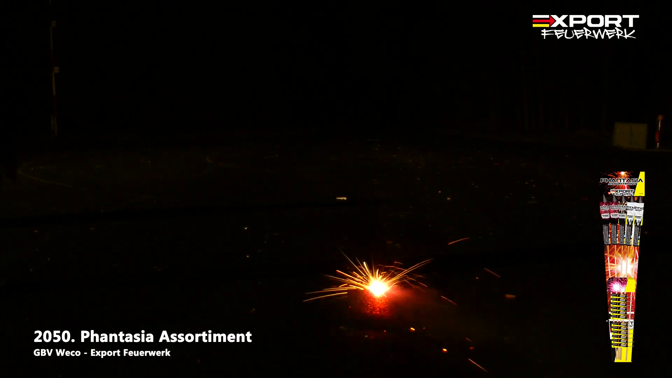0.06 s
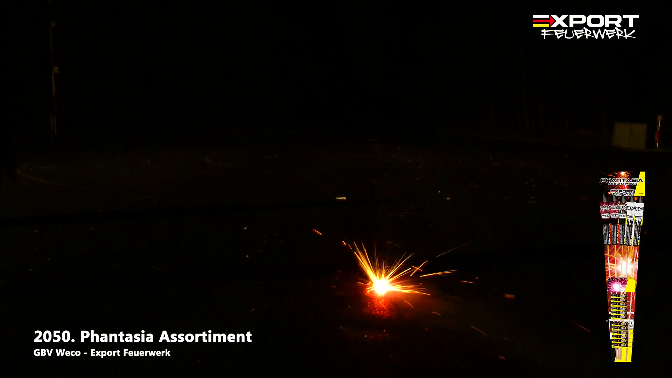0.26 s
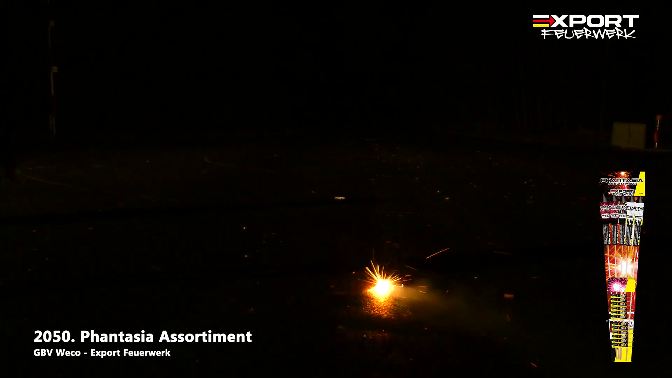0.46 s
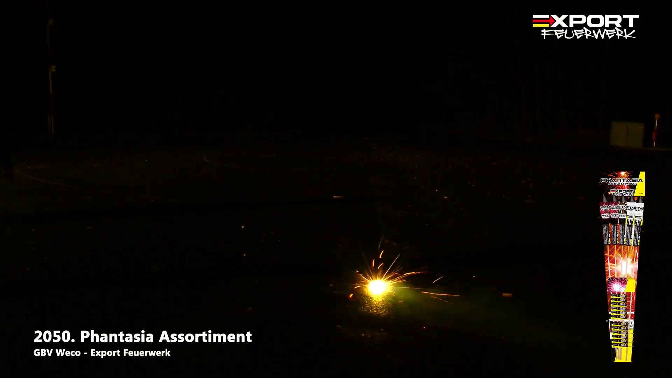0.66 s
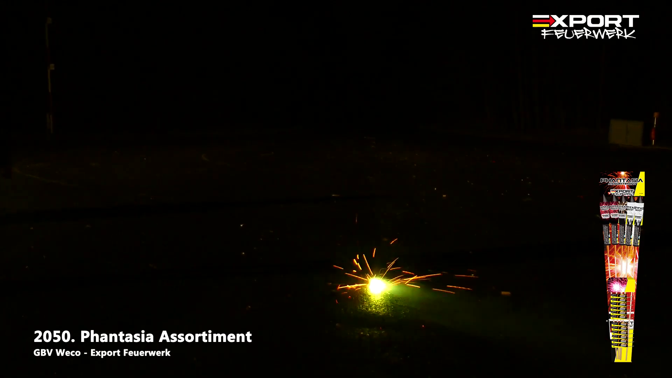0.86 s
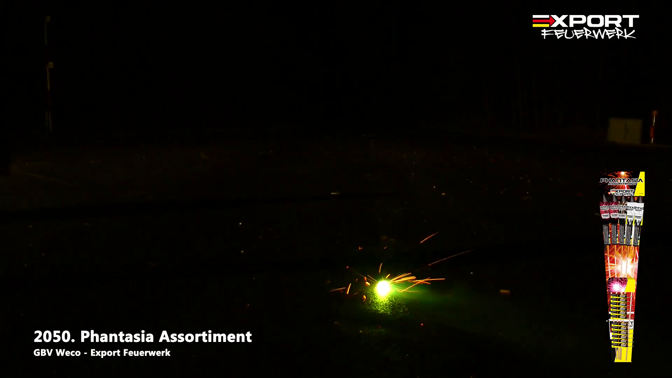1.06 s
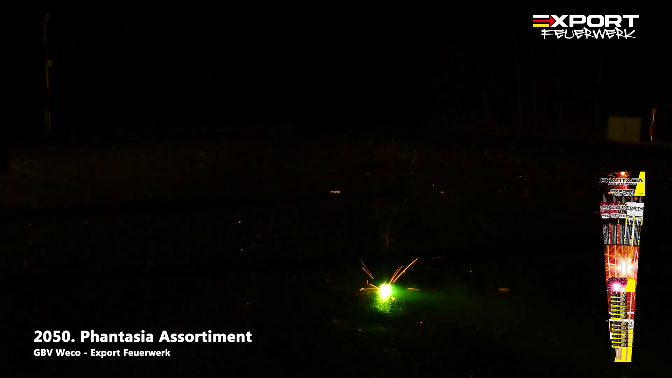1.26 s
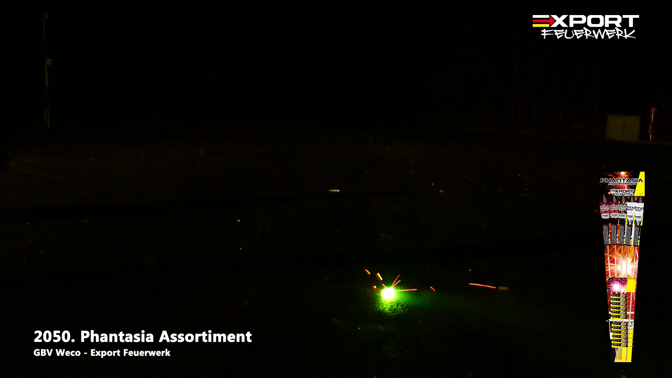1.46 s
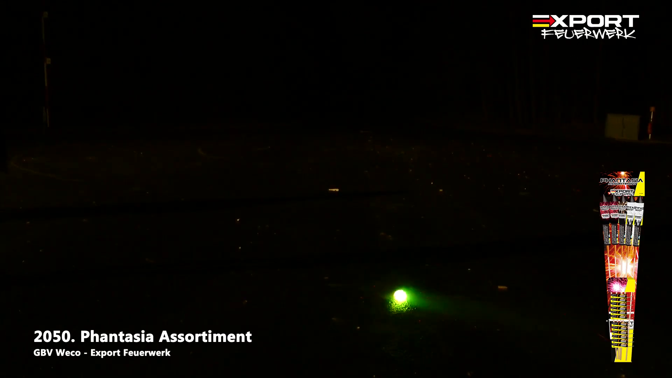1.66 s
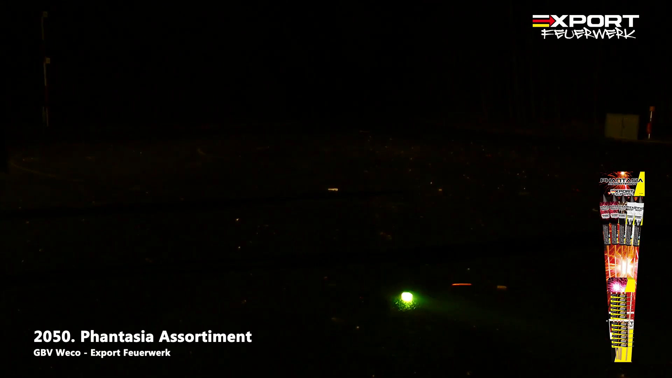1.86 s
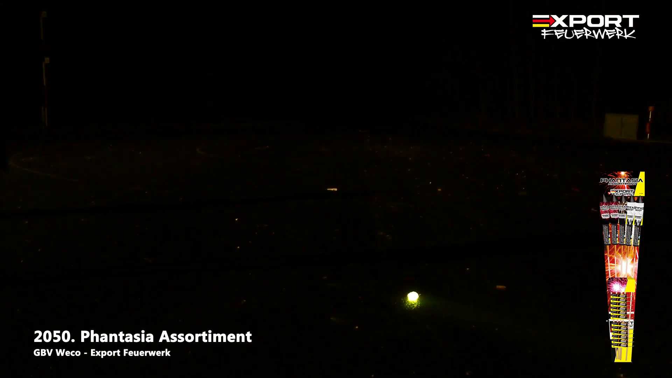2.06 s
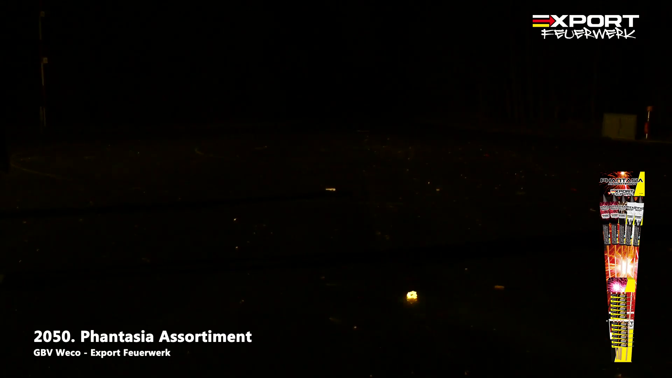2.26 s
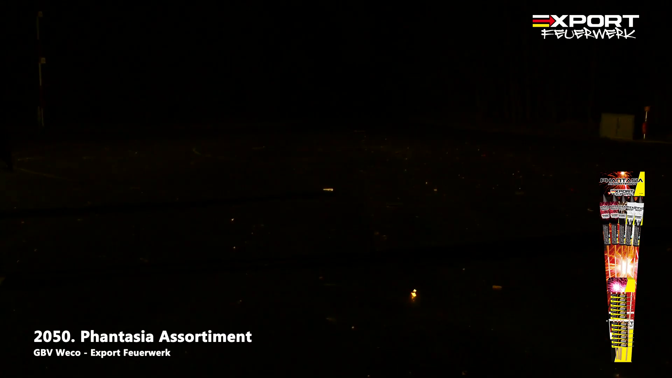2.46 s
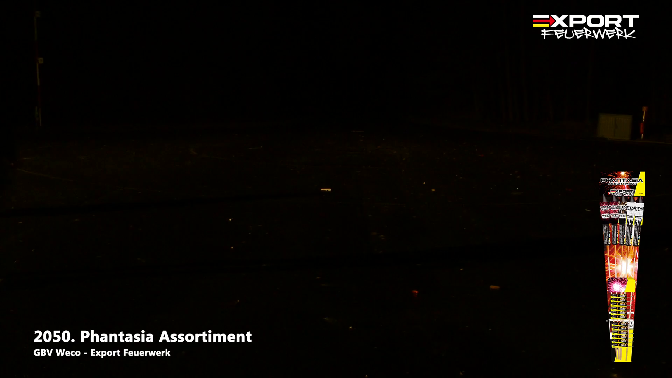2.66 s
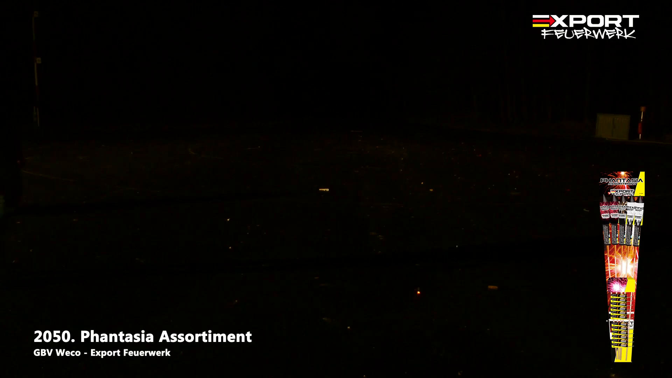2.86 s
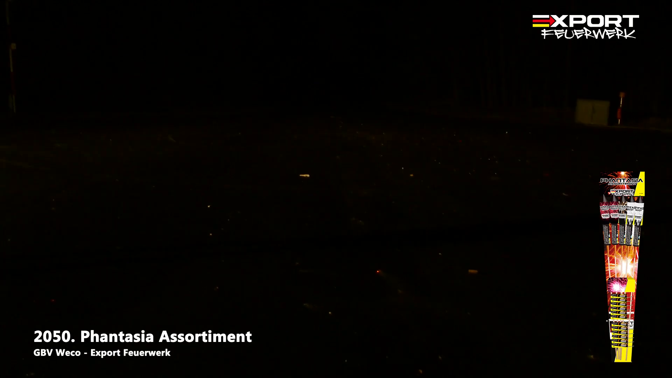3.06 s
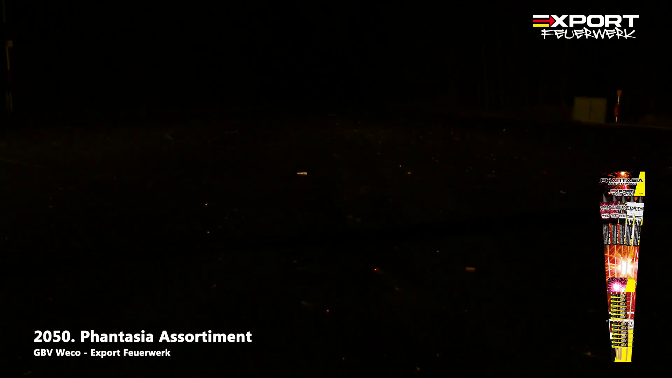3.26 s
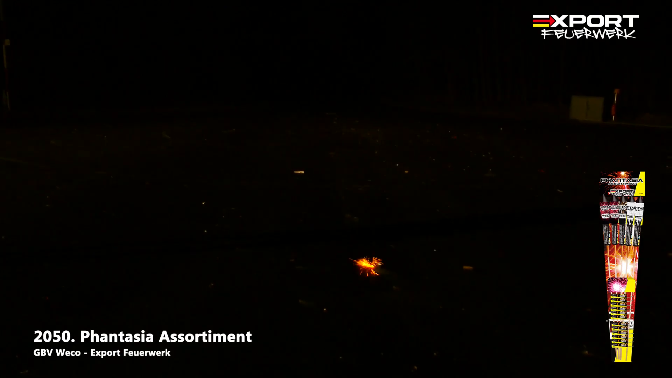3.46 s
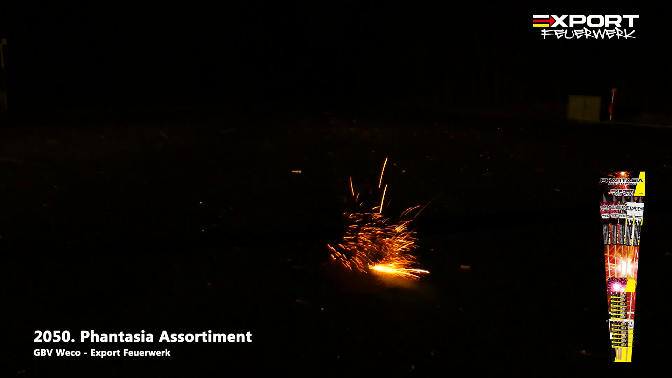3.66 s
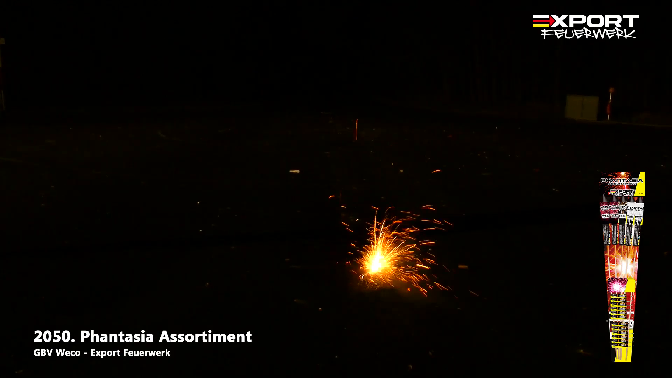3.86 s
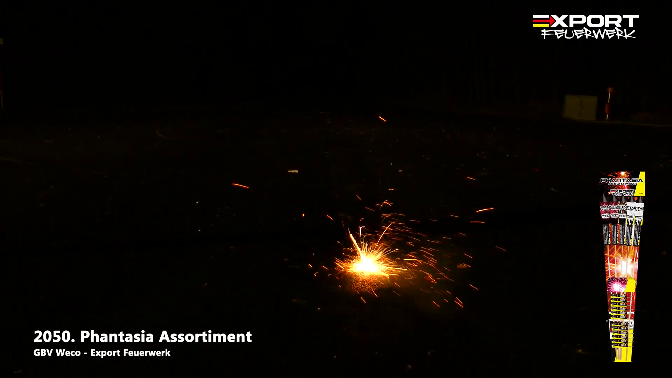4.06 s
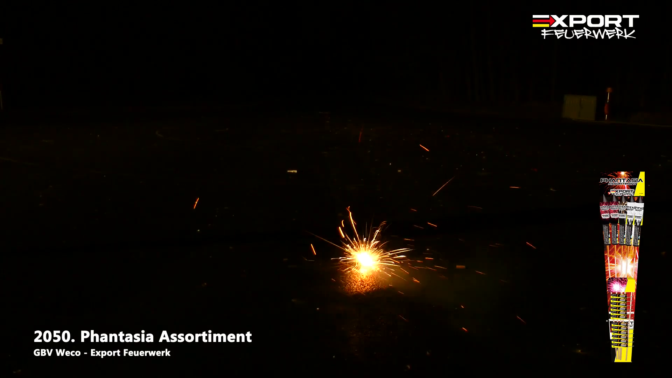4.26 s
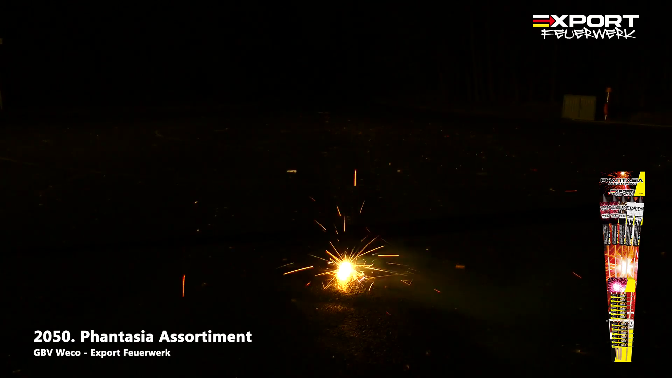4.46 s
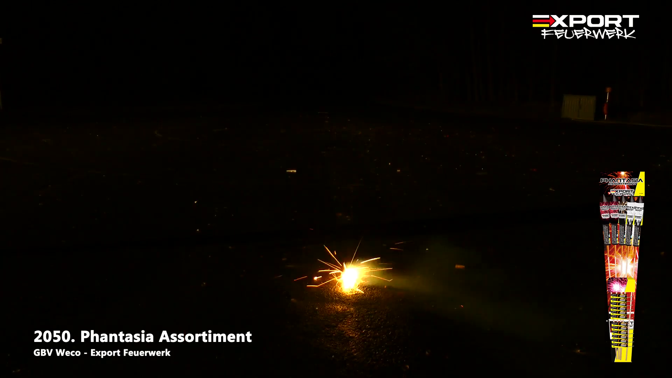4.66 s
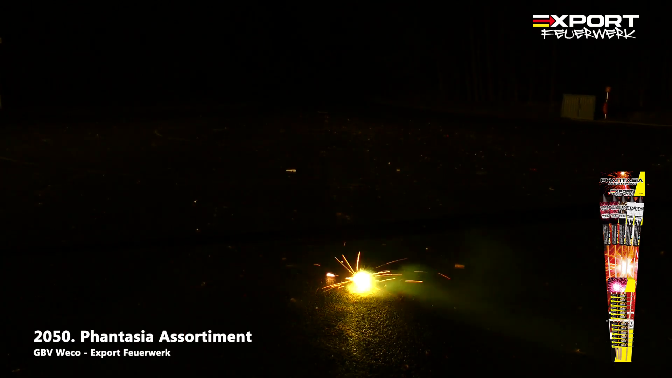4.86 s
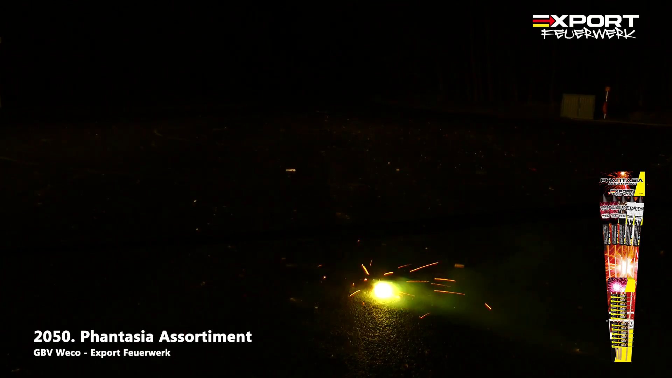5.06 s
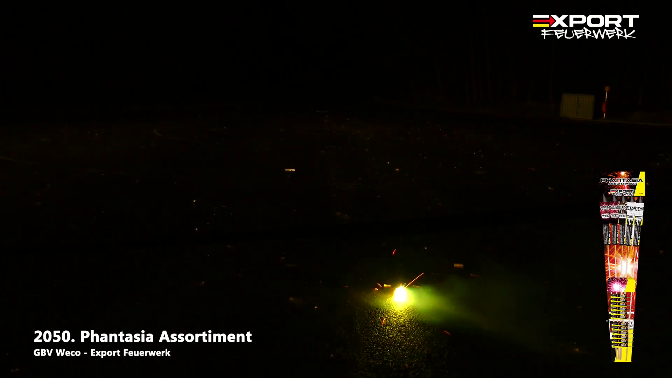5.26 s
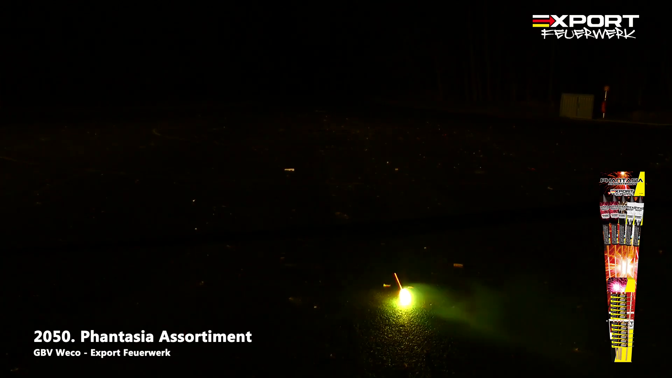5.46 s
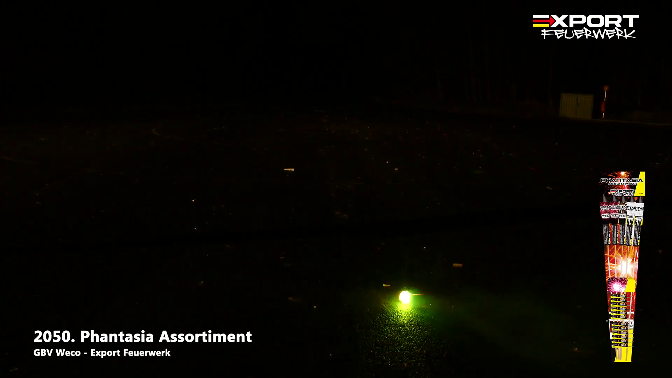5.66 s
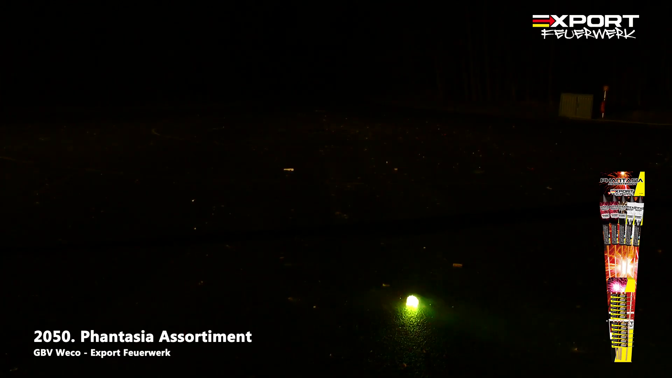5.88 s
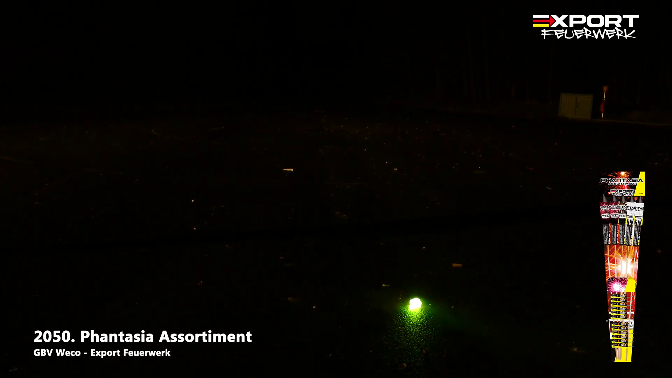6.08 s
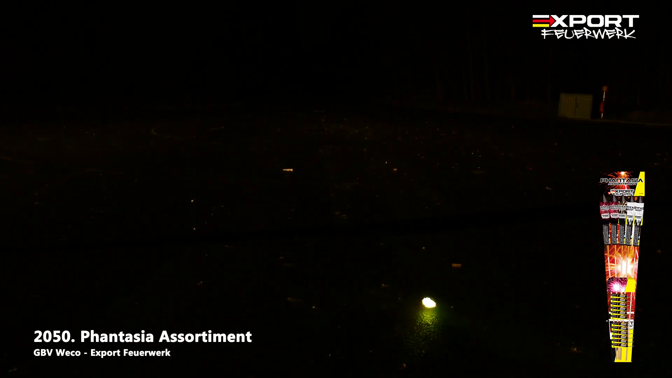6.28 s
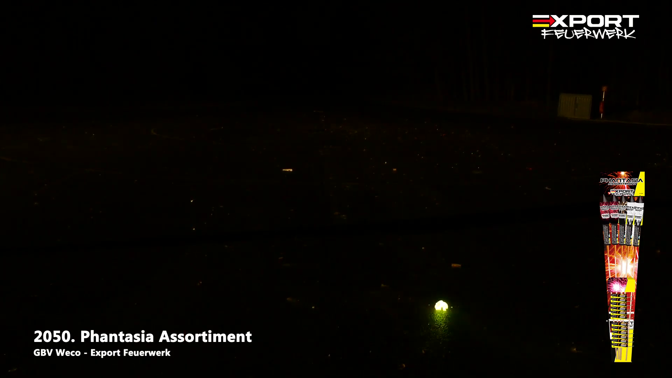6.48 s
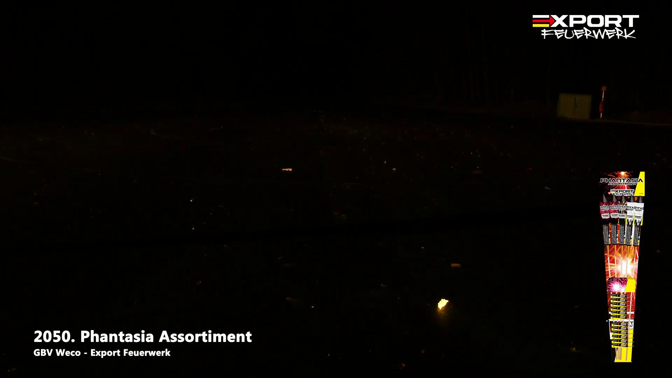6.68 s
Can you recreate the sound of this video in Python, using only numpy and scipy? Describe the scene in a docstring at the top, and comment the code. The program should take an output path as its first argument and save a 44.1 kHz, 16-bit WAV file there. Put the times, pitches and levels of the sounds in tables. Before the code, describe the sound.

Outdoors at night, wind bumps low against a microphone a few metres from a small spinning firework on pavement. From 0 s it is in full burn: a loud, rough hiss and roar with a fast buzzing throb, bright sizzle and scattered pops. From about 1.5 s the treble drains away, leaving a duller roar that drops sharply near 2.1 s and sputters out by 2.65 s. Wind and faint air remain; a dull click comes at 2.94 s, then a dry rattle at 2.98 s, cut off almost at once. Around 3.6 s a second spinner fizzes up, turning slowly, then erupts in dense sharp cracks from 3.85 to 4.35 s. Its throb accelerates into a fast whirring buzz by 4.5 s, the hiss sweeping hollowly as it hops. After 5.2 s it slows and darkens, collapsing near 6.35 s into faint, uneven spurts until 6.7 s.

```python
"""A spinning firework is hissing and roaring on pavement at night, a few metres from a wind-buffeted microphone.
It throbs once a turn, spits sparks and dies down; a dry rattle is cut off short, then a second spinner burns.
The jets are coloured noise under a rotating beam, with sparse grains for sparks; pops and a click are noise bursts.
A delayed, duller copy is the pavement echo, which sweeps as the second spinner hops.
The rattle is decaying bands of noise; wind and night air are noise with wandering levels."""
import sys
import numpy as np
from scipy import signal
from scipy.fft import rfft, irfft
from scipy.io import wavfile
from scipy.ndimage import uniform_filter1d, map_coordinates

SR = 44100
rng = np.random.default_rng(int(sys.argv[2]) if len(sys.argv) > 2 else 0)


def wav_record(signal):
    """Record a signal, one row per channel, as 16-bit PCM in the file named by sys.argv[1]."""
    frames = np.transpose(np.atleast_2d(signal))
    bounded = np.clip(frames, -1, 1)
    # unit amplitude maps onto the largest positive 16-bit level
    quanta = np.round(bounded * 32767).astype(np.int16)
    wavfile.write(sys.argv[1], SR, quanta)


N = 296341  # length in samples

# Wind at the microphone: (time [s], buffet level [dB], thud against buffet [dB], flutter against buffet [dB])
WIND_LEVELS = [(0, -26.5, 3, 2), (.27, -20.5, -1.5, -3), (.48, -22.5, 1, -1), (.75, -32.5, -4, 3.5),
               (1.25, -29.5, -5.5, -1), (1.6, -29, -4.5, -1), (1.85, -28, -4, -3.5), (2.2, -30.5, -3, -3.5),
               (2.5, -29, -7, -7.5), (2.95, -24.5, -6, -6.5), (3.1, -29, 0, -5), (3.4, -27.5, -3.5, -4.5),
               (3.7, -32.5, -1, -6), (4.07, -36, -14, 5), (4.3, -25.5, -7, -5), (4.7, -32, -13, -3.5),
               (5.3, -34, -5.5, -1.5), (6.2, -36, -2, -3), (6.72, -42, 2, -3)]
# Short gusts (plus) and lulls (minus), before each wind layer takes its share: (time [s], width [ms], change [dB])
GUSTS = [(.77, 76, 3.5), (1.35, 28, 7), (2.62, 40, 2.5), (2.71, 30, -7), (3.35, 32, -8), (3.48, 41, 4.5),
         (3.57, 33, -4), (4.6, 61, 4), (5.44, 48, -8), (6.32, 29.5, -10), (6.53, 57, 3.5)]
# Wind spectra, lowest layer first: (frequency [Hz], relative density [dB per Hz])
THUD_SPECTRUM = [(15, -35), (30, -9), (50, -3.5), (80, 5.5), (110, -15.5), (300, -64)]
BUFFET_SPECTRUM = [(30, -37), (70, -13.5), (100, 4), (170, 2.5), (220, -6), (330, -50), (900, -64)]
FLUTTER_SPECTRUM = [(130, -15), (220, 0.5), (300, -3.5), (420, -9.5), (700, -20), (1100, -41), (3000, -67)]
BREEZE_DB = -42.5, -37, -47  # wind that never drops: thud, buffet, flutter

# Spectrum of the night air: (frequency [Hz], relative density [dB per Hz])
NIGHT_SPECTRUM = [(400, -16), (900, 5.5), (2050, -2), (2480, -5), (3000, -2), (3400, -7), (4100, -6),
                  (8000, -12.5), (9500, -19.5), (15500, -23)]
NIGHT_DB = -47

# First spinner; the faint hiss after it stops, its treble rising until the rattle ends; second spinner.
# One list each, before surges and echo:
# (time [s], roar level [dB], hiss level [dB], sizzle level [dB], rumble level [dB])
BURN_LEVELS = [
    [(0, -26, -18, -27.5, -36), (.3, -27.5, -18, -25, -35.5), (.52, -27, -19, -29.5, -35),
     (.75, -26, -17.5, -29, -30), (1.25, -27, -18.5, -28.5, -33.5), (1.55, -27, -22.5, -35.5, -32.5),
     (1.7, -28, -26.5, -40, -36.5), (1.95, -26, -26, -41, -34), (2.12, -31, -42, -66, -34),
     (2.35, -34, -47, -75, -39), (2.575, -36, -54, -79, -37.5)],
    [(2.578, -42, -51, -79, -50), (2.72, -50, -52, -72, -52), (2.87, -54, -51, -53, -51),
     (3.02, -43, -45, -44, -42)],
    [(3.57, -40, -32, -47, -48), (3.7, -32.5, -27.5, -36, -36.5), (3.78, -25, -21, -29, -34.5),
     (4.05, -22.5, -21.5, -32.5, -28.5), (4.27, -29, -21, -27.5, -38.5), (4.5, -24.5, -17, -24, -33),
     (4.75, -28, -16, -25.5, -37), (5.0, -27, -19, -26.5, -38), (5.17, -29.5, -22.5, -30, -36),
     (5.3, -26, -23, -38, -37.5), (5.47, -24.5, -17, -39, -36.5), (5.6, -25.5, -24.5, -36, -36),
     (5.97, -27, -28.5, -47, -35.5), (6.32, -26, -34.5, -58, -40), (6.36, -31, -47, -66, -40),
     (6.72, -35.5, -54, -72, -40)],
]
# Whirl of the spinners, before random unsteadiness and each layer's share: (time [s], turn rate [turns/s],
# throb depth [dB] (plus: brief dips, minus: brief bursts), spark level against the gas [dB])
SPIN = [(0, 68, 4, 2), (.5, 83, 4, -0.5), (.8, 87, 10, -5), (1.0, 88, 5, -3), (1.6, 95, 5, -18),
        (1.9, 70, 6.5, -20), (2.25, 79, 5, 1), (2.6, 51, 7, -1), (3.6, 4, -6, -9), (3.8, 12.2, -1, 1.5),
        (3.9, 20.2, -10.5, -10), (4.0, 45, -5.5, 0), (4.15, 110, -4, -5.5), (4.4, 146, -5.5, -7),
        (4.55, 150, 6.5, -2), (4.8, 146, 6, -9), (5.2, 117, 3, -16), (5.75, 75, 6, -15), (6.1, 62, 9, -30),
        (6.4, 48, 3, 1.5), (6.72, 50, 26, 5)]
# Brief flares (plus) and falters (minus) of the jets, before each layer takes its share:
# (time [s], width [ms], change [dB])
SURGES = [(.34, 22, -2.5), (.46, 37, -1.5), (.62, 24, 3), (.665, 20, -3), (1.48, 32, 0), (1.59, 30, 3),
          (1.88, 26, -2), (2.07, 18, 1), (2.13, 25, -1.5), (2.19, 29, 3), (2.335, 9, 4.5), (2.355, 8, -6),
          (2.397, 6, 2), (2.43, 16, 7.5), (2.465, 7.9, -6), (2.485, 8, 6), (2.555, 12, 5), (2.634, 7.9, 16),
          (3.845, 18, -3), (3.87, 10, 4.5), (3.91, 11, 3), (3.932, 8.9, -4), (3.951, 5, 4), (3.963, 5, -3),
          (3.976, 5, 4), (4.59, 11.3, -1.5), (5.24, 31, -3), (6.02, 14.5, -4), (6.07, 22, 2.5),
          (6.12, 44, -3), (6.2, 12, 5), (6.225, 13, -4.5), (6.45, 7.1, 4.5), (6.53, 9.7, 3), (6.55, 10, -4),
          (6.585, 15, 4.5), (6.62, 8, 6), (6.648, 5.8, 5), (6.665, 8, -5), (6.685, 4.8, 2)]
# Jet spectra: (frequency [Hz], relative density [dB per Hz])
ROAR_SPECTRUM = [(400, -64.5), (800, -22), (1100, -7), (1420, 1), (2300, 1.5), (2900, -5), (4000, -5),
                 (7000, -16.5), (11000, -83)]
HISS_SPECTRUM = [(900, -59.5), (1800, -9.5), (2900, -4), (3300, -5), (5200, 0.5), (8600, -4), (9600, -14),
                 (11500, -25.5), (15000, -67)]
SIZZLE_SPECTRUM = [(5000, -47), (8000, 5.5), (9500, 2), (11000, -5), (12500, -5.5), (14000, -16),
                   (15500, -17)]
RUMBLE_SPECTRUM = [(200, -15.5), (400, -5), (520, -3), (860, -1), (1050, -10), (1500, -20), (4000, -73)]
FIRST_ROCKING, SECOND_ROCKING = 0.25, 0.15  # share of rocking in the beam of each spinner
SECOND_LIT_S = 3.1  # the second spinner's rocking applies from here
SPUTTER_DB = 1  # sputter when roar equals hiss
SPUTTER_PER_DB = 0.15  # its growth for each dB the hiss sinks under the roar

# Pops of larger powder grains, and one separate dull click at 2.94 s, before the echo:
# (time [s], peak level [dB], swell time [ms])
POP_AND_CLICK_EVENTS = [(.1461, -11, 1.1), (0.371, -8.5, 1), (0.3915, -4.5, 0.83), (.766, -6, 1.2),
                        (0.8622, -4.5, 1.5), (.9363, -4.5, 1.1), (1.3396, -10, 1.2), (1.6, -8, 1),
                        (2.0647, -14, 1.3), (2.146, -18.5, 1.5), (2.394, -28, 2), (2.422, -29, 4),
                        (2.706, -27, .6), (2.9421, -18, 0.25), (3.8684, -6, 2.9), (3.904, -7, 3.7),
                        (3.916, -3, .52), (3.9476, -9, 1.4), (3.973, -2, 0.96), (4.0291, -2, .8),
                        (4.0359, -9, 1.5), (4.047, 0, 0.45), (4.0718, -6, 1.5), (4.104, -8, 1.5),
                        (4.1159, 0, 0.44), (4.143, -2, 0.48), (4.1744, -11, .52), (4.1874, -6, 0.51),
                        (4.2147, -6, 0.57), (4.2522, -7, 0.96), (4.3409, -4, .48), (4.5925, -8, 1.56),
                        (4.787, -14, 1.5), (5.0867, -10.5, 0.65), (6.0272, -20, 1.5), (6.199, -19.5, 2.5),
                        (6.3752, -25, 1.5), (6.448, -25, 1.8), (6.681, -29, 1.6), (6.7037, -34, 1.1)]
# Spectrum of their dull thump: (frequency [Hz], relative density [dB per Hz])
THUMP_SPECTRUM = [(300, -26.5), (700, -2.5), (1500, 1.5), (2500, 5.5), (3500, 1.5), (5500, -22),
                  (11000, -56)]
CRACK_DB, CRACK_PER_DB = -4, -0.25  # crack gain for an event at 0 dB, and its change per dB of event level

# Hops of the second spinner: (take-off time [s], landing time [s], extra echo delay at the top [ms])
HOPS = [(4.358, 4.583, .19), (4.596, 4.795, 0.11), (4.922, 5.096, 0.098), (5.388, 5.584, 0.15),
        (5.729, 5.806, 0.068)]
GROUND_MS = 0.033  # mean echo lag with the spinner on the ground
GROUND_SHARE, GROUND_HZ = 0.62, 8500  # echo gain and its treble cutoff

# Resonances of the rattle: (frequency [Hz], time to fall 60 dB [s], level within the rattle [dB])
RATTLE_MODES = [(1260, 0.16, -8), (1580, 0.3, -5), (1850, 0.55, -4), (2980, 0.19, 0), (4600, 0.15, -7),
                (6400, 0.097, -6), (8200, 0.11, -17), (12500, 0.55, -25)]
RATTLE_S, RATTLE_STOP_S, RATTLE_DB = 2.982, 3.023, -22.5

TOP_HZ = 15680  # upper edge of the recorder's passband


def undb(db):
    """Amplitude factor for a level in dB."""
    return 10 ** (np.asarray(db) / 20)


def unit(x):
    """Scale to an RMS of 1."""
    return x / np.sqrt(np.mean(x ** 2))


def columns(table, **ends):
    """Table columns joined by straight lines, one value a sample."""
    times_s, *values = np.transpose(table)
    return [np.interp(np.arange(N) / SR, times_s, column, **ends) for column in values]


def colour(x, shape, size=2048):
    """Minimum-phase filter of unit power with the given (frequency [Hz], density [dB]) shape."""
    hz, db = np.transpose(shape)
    bins_hz = np.arange(size + 1) * SR / (2 * size)
    log_gain = np.interp(np.log(bins_hz + 1), np.log(hz), db) * np.log(10) / 20
    # folding the cepstrum forward in time makes the filter causal
    cepstrum = irfft(log_gain)
    cepstrum[1:size] *= 2
    cepstrum[size + 1:] = 0
    response = irfft(np.exp(rfft(cepstrum)))[:size]
    response = response / np.sqrt(np.sum(response ** 2))
    return signal.fftconvolve(x, response)[:len(x)]


def walk(rate):
    """Random levels held 1 / rate s and smoothed twice; RMS 1."""
    hold = int(SR / rate)
    steps = np.repeat(rng.standard_normal(N // hold + 1), hold)
    return unit(uniform_filter1d(uniform_filter1d(steps, hold), hold)[:N])


def uneven(db, size):
    """Quick level changes that keep the mean power over size samples."""
    return undb(db) / np.sqrt(uniform_filter1d(undb(2 * db), size))


def bumps(table):
    """Bell-shaped level changes in dB at the given moments, drawn on a 1 ms grid."""
    ms = np.arange(N * 1000 // SR + 1)
    db = sum(top_db * np.exp(-((ms - 1000 * s) / width_ms) ** 2) for s, width_ms, top_db in table)
    return np.interp(np.arange(N) * 1000 / SR, ms, db)


def wind():
    """Gusts buffet the microphone: unsteady lumps of low pressure, the quick flutter more ragged."""
    buffet_db, thud_db, flutter_db = columns(WIND_LEVELS)
    gust_db = bumps(GUSTS)
    # (spectrum, level against the buffet [dB], share of the gusts, raggedness [dB], slow drift [dB])
    layers = [
        (THUD_SPECTRUM, thud_db, 0.6, 0.6, 2.5),
        (BUFFET_SPECTRUM, 0, 0.95, 1.1, 1.2),
        (FLUTTER_SPECTRUM, flutter_db, 1.1, 2.1, 1.5),
    ]
    out = 0
    for steady_db, (shape, db, gusty, ragged_db, drift_db) in zip(BREEZE_DB, layers):
        ragged = uneven(ragged_db * walk(90), size=5000)
        drift = uneven(drift_db * walk(9), size=30000)
        lumps = ragged * drift * rng.standard_normal(N)
        # gusts and steady breeze add in power
        level = np.hypot(undb(buffet_db + db + gusty * gust_db), undb(steady_db))
        out = out + level * colour(lumps, shape, size=8192)
    return out


def night_air():
    """Faint background of the place: coloured noise whose level wavers slightly."""
    level = undb(NIGHT_DB + 0.48 * walk(20.6))
    return level * colour(rng.standard_normal(N), NIGHT_SPECTRUM)


def sparks(rate, spread_db):
    """Single grains bursting at random, rate a second on average, with a cap on the largest grain."""
    arrival, loudness, polarity = rng.random((3, N))
    size_db = np.minimum(-spread_db * np.log(1 - loudness), 14)
    size = undb(size_db) * np.sign(polarity - 0.5)
    return unit(size * (arrival < rate / SR))


def jets():
    """Turbulent gas and sparks, throbbing as the nozzle swings past the microphone; faint hiss between burns."""
    turns, depth_db, spark_db = columns(SPIN)
    rocking = np.where(np.arange(N) / SR < SECOND_LIT_S, FIRST_ROCKING, SECOND_ROCKING)
    angle = 2 * np.pi * np.cumsum(turns * (1 + 0.0309 * walk(20))) / SR
    # a broad beam with a narrow shadow behind the tube
    beam = np.cos(angle) - 0.91 * np.cos(2 * angle - 0.3)
    # the tube rocks on its axis, so every second turn differs
    beam = beam + rocking * (np.cos(angle / 2) + np.cos(3 * angle / 2))

    # each list adds next to nothing outside its own times
    levels = np.sum([undb(columns(burn, left=-120, right=-120)) for burn in BURN_LEVELS], axis=0)
    roar_over_hiss_db = 20 * np.log10(levels[0] / levels[1])
    unsteady_db = np.maximum(SPUTTER_DB + SPUTTER_PER_DB * roar_over_hiss_db, 0)
    sputter_db = 0.96 * unsteady_db * np.tanh(walk(140))  # the burn rate wavers within bounds
    grit = undb(spark_db) * sparks(rate=2200.0, spread_db=4.5)
    surge_db = bumps(SURGES)

    # (spectrum, share of the throb, of the sputter, of the surges, own flicker [dB], spark share)
    layers = [
        (ROAR_SPECTRUM, 0.5, 1.1, 0.7, 1.5, 1.1),
        (HISS_SPECTRUM, 0.95, 1.1, 1.05, 1.1, 0.9),
        (SIZZLE_SPECTRUM, 0.8, 1.1, 1.3, 0.6, 0.6),
        (RUMBLE_SPECTRUM, 0.3, 0.9, 0.6, 1.5, 0.9),
    ]
    out = 0
    for level, (shape, throb, uneasy, surge, flicker_db, spark_share) in zip(levels, layers):
        throb_db = throb * depth_db * beam / 2
        own_db = flicker_db * np.tanh(walk(200))
        swell = uneven(throb_db + uneasy * sputter_db + own_db, size=1400)
        if shape is RUMBLE_SPECTRUM:
            swell = swell * uneven(2.0 * walk(22), size=20000)  # the low flame billows
        # more sparks leave less steady gas, at about the same power
        mix = np.sqrt(1 + (spark_share * undb(spark_db)) ** 2)
        gas = (rng.standard_normal(N) + spark_share * grit) / mix
        out = out + colour(level * undb(surge * surge_db) * swell * gas, shape)
    return out


def pops_and_click():
    """Pops of larger powder grains, and one separate dull click: a thump plus a brighter crack, soon dying."""
    length = 2000  # samples an event
    out = np.zeros(N + length)
    t_ms = np.arange(length) * 1000 / SR
    noises = rng.standard_normal((len(POP_AND_CLICK_EVENTS), length))
    for (s, db, swell_ms), noise in zip(POP_AND_CLICK_EVENTS, noises):
        puff = noise * t_ms * np.exp(-t_ms / swell_ms)
        thump = colour(puff, THUMP_SPECTRUM)
        crack = undb(CRACK_DB + CRACK_PER_DB * db) * colour(puff, HISS_SPECTRUM)
        burst = thump + crack
        start = int(s * SR)
        out[start:start + length] += undb(db) * burst / np.abs(burst).max()
    return out[:N]


def pavement(x):
    """The echo off the ground lags more while the spinner is in the air, on a ballistic arc."""
    t = np.arange(N) / SR
    lag_ms = GROUND_MS + 0.014 * walk(150)
    for start, stop, top_ms in HOPS:
        u = np.clip((t - start) / (stop - start), 0, 1)
        lag_ms += 4 * top_ms * u * (1 - u)
    # the rough surface scatters the treble away
    dull = signal.sosfiltfilt(signal.butter(2, GROUND_HZ, fs=SR, output="sos"), x)
    echo = map_coordinates(dull, [np.arange(N) - lag_ms * SR / 1000], order=1, mode="nearest")
    return undb(-3.0) * (x + GROUND_SHARE * echo)


def rattle():
    """A hard knock whose resonances chatter on until the sound breaks off."""
    t = np.arange(N) / SR - RATTLE_S
    on = (t >= 0) & (t < RATTLE_STOP_S - RATTLE_S)
    out = 0
    for hz, t60, db in RATTLE_MODES:
        # a narrow peak with steep skirts
        shape = [(hz / 4, -60), (hz / 1.45, -17), (hz / 0.99, 0),
                 (hz * 1.04, 0), (hz * 1.2, -17), (hz * 4, -60)]
        band = colour(rng.standard_normal(N), shape)
        decay = undb(db - 60 * np.abs(t) / t60)
        out = out + decay * band / np.std(band[on])
    return undb(RATTLE_DB) * on * out


def scene():
    """Wind and night air, the jets, pops and click with their pavement echo, and the rattle; one channel."""
    near_ground = pavement(jets() + pops_and_click())
    return (wind() + night_air() + near_ground + rattle())[None]


def record(dry):
    """The recorder rounds the loudest peaks and cuts the top steeply."""
    rounded = np.tanh(0.9 * dry) / 0.9
    # 14th order, 0.2 dB passband ripple, 100 dB stopband
    return signal.sosfilt(signal.ellip(14, 0.2, 100, TOP_HZ, fs=SR, output="sos"), rounded)


dry = scene()
out = record(dry)
wav_record(out)
```